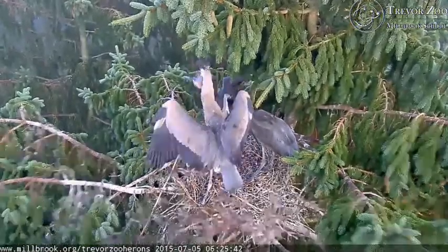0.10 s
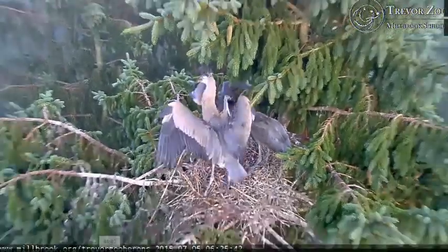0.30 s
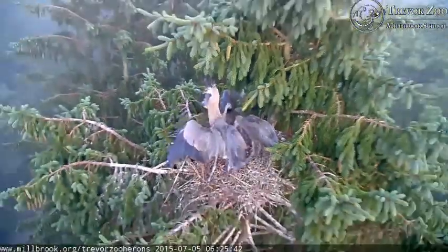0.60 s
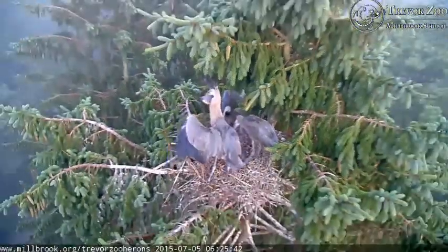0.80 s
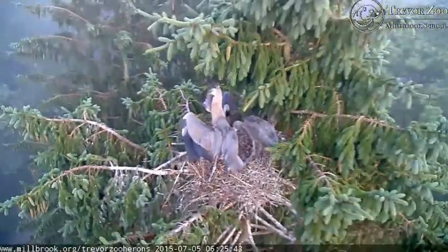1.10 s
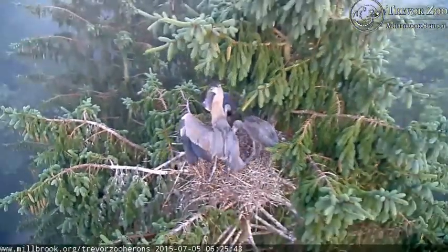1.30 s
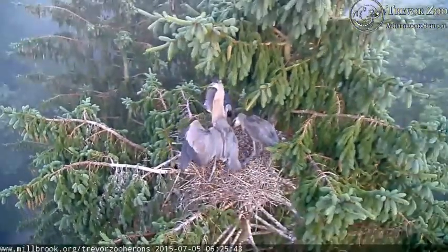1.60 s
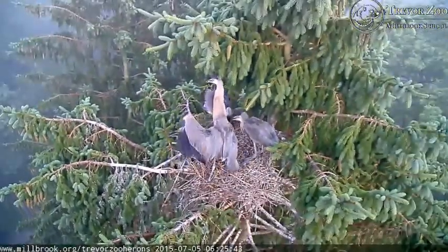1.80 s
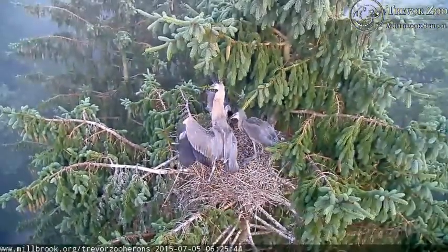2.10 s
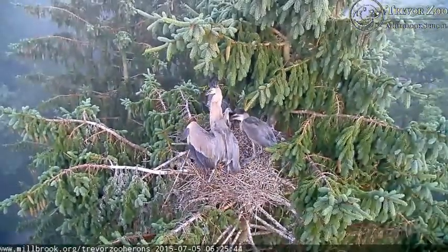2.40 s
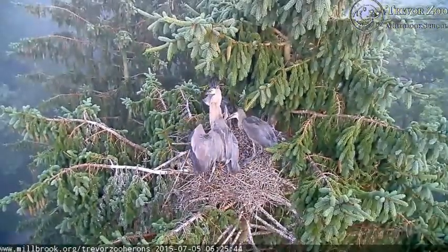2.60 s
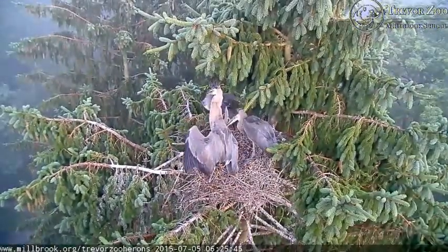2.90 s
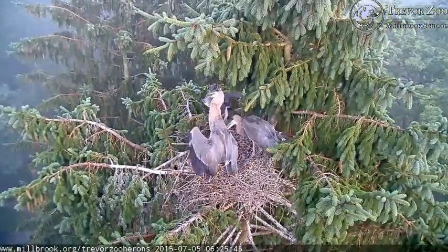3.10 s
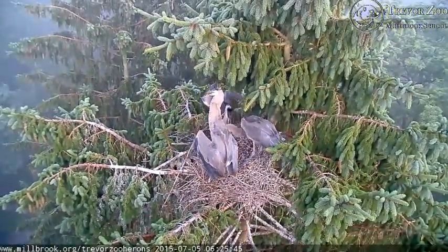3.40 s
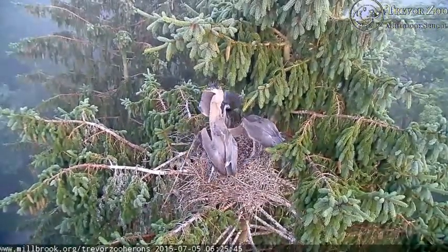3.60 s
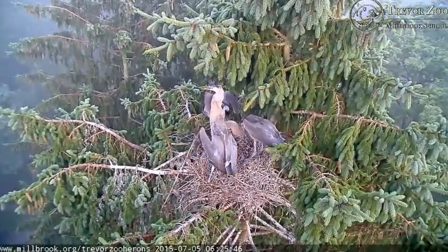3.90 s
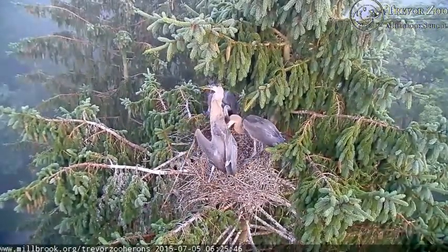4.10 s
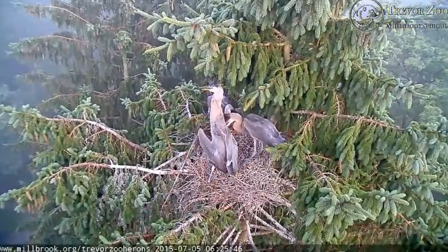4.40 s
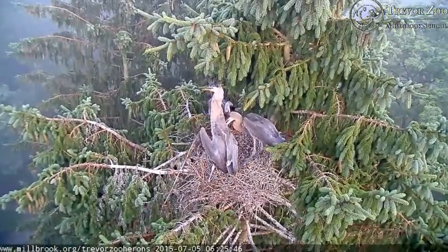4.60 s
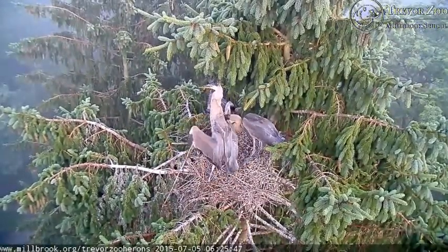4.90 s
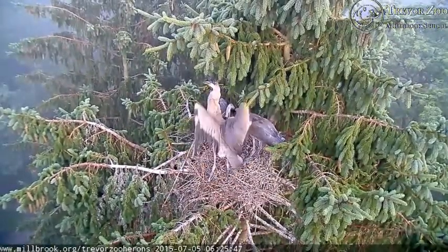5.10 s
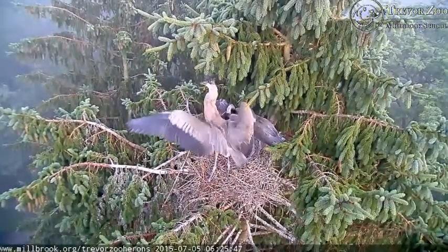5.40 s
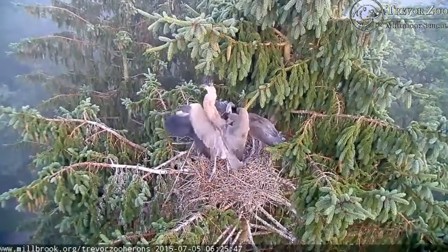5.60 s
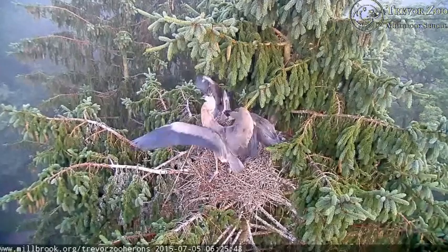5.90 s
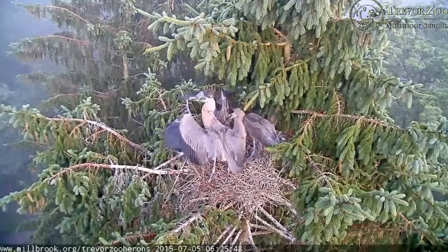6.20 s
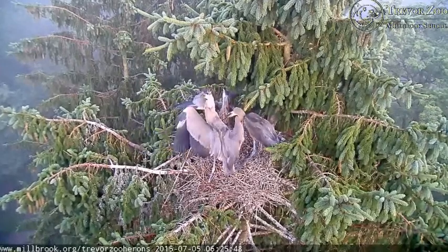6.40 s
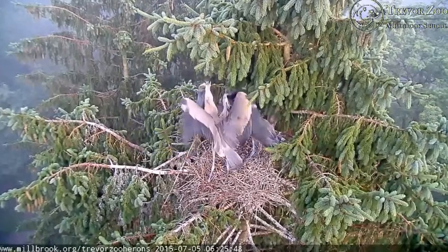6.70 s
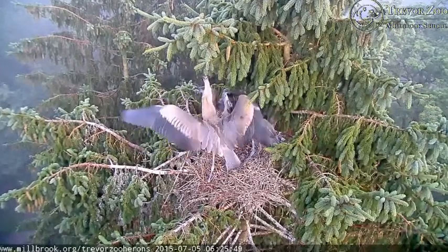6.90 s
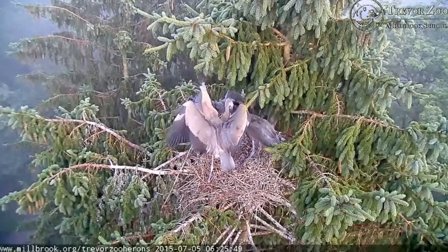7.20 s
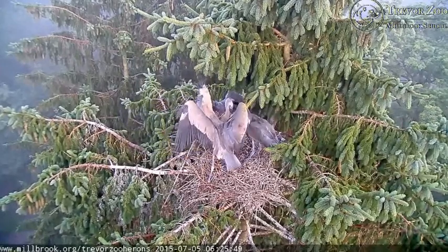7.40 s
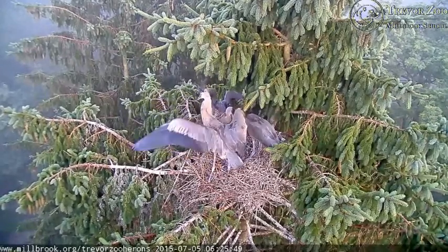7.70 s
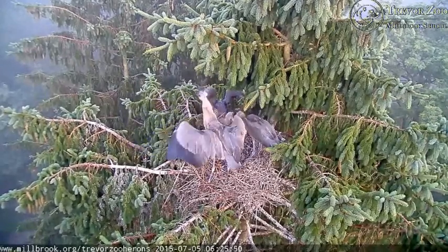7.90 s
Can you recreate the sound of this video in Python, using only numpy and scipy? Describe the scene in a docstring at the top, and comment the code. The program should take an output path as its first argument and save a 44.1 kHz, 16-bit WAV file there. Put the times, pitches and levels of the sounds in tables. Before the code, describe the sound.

Heron chicks beg with dry, rapid, rattling kek calls, pausing twice, while distant songbirds whistle in the woods.

```python
"""Heron chicks beg in a treetop nest: dry, rattling "kek" calls, about seven a second, ring in throat
and bill. At first a far songbird trills and wings flap, then feet knock on the sticks. Near 3 seconds
the chicks pause and songbirds whistle in the woods. The keks return, sink to soft grumbles and brushing
feathers around 6 seconds, then burst out again with the loudest call. All along, a nest camera's dull
microphone adds a little hum and a thin wavering whine to the wash of the woods."""
import sys
import numpy as np
from scipy import signal
from scipy.fft import rfft, irfft, next_fast_len
from scipy.io import wavfile
from scipy.ndimage import uniform_filter1d, minimum_filter1d, map_coordinates

SR = 44100
rng = np.random.default_rng(int(sys.argv[2]) if len(sys.argv) > 2 else 0)


def master_out(mix):
    """Clip the mix to full scale and print it as 16-bit PCM to the path in sys.argv[1]."""
    frames = np.transpose(np.atleast_2d(mix))
    ceiling = np.clip(frames, -1, 1)
    pcm = np.round(ceiling * 32767).astype(np.int16)
    wavfile.write(sys.argv[1], SR, pcm)


N = 356328
TIME = np.arange(N) / SR

KEK_S, CLACKS_PER_S = 0.059, 76  # length and rattle speed of an easy call
STRAIN_DB, RATTLE_PER_DB, FASTEST_PER_S = -24, 12, 135  # above this level, the rattle speeds up
FORCED_DB, HALVING_DB = -18, 5.5  # above this level, the call runs out sooner
MOUTH_LAG = 0.53  # dB the mouth falls behind the bill for each dB of effort
# How the tone drifts as the bill opens and closes. Each row: time in seconds, bill resonance in Hz,
# upper bill resonance in relative dB, mouth in relative dB, level in dB where the throat stops growing.
BILL_OPENING = [(0, 2500, -8, -12, -43), (0.761, 2490, -3, -8, -40.5), (1.04, 2470, -4, 0, -34),
                (1.45, 2390, -3.5, -14, -37), (1.94, 2610, -4.5, -2.5, -36), (2.56, 2850, -6.5, -7, -35),
                (3.78, 2520, -0.5, -9, -36), (4.03, 2200, 2, -19, -36.5), (4.3, 2530, -0.5, -8, -31),
                (4.85, 2620, -1, 0, -33), (5.05, 2880, -12.5, -7, -30.5), (5.3, 2950, -0.5, -2.5, -31),
                (5.68, 2160, -1, 1.5, -34.5), (6.68, 2590, -21, -2.5, -36), (6.79, 2620, -12, -21, -36.5),
                (7.23, 2690, 2, -19, -35.5), (7.4, 2570, -9, -4, -36), (7.69, 2660, -8, -10, -37.5),
                (7.84, 2660, -7.5, -9, -39)]
# Begging calls. Each row: time of the peak in seconds, level in dB, rise in seconds, rasp from 0 to 1.
BEGGING_CALLS = [(.003, -32, 0.025, 0.37), (0.093, -38, 0.016, 0.47), (0.263, -36.5, 0.021, 0.18),
                 (.629, -22, 0.029, 0.38), (.676, -29, 0.0096, .5), (.76, -19.5, 0.028, 0.32),
                 (.906, -22.5, 0.033, 0.31), (1.042, -27, 0.023, 0.64), (1.193, -24, 0.021, 0.37),
                 (1.341, -21, 0.029, 0.11), (1.488, -20.5, 0.029, 0.32), (1.634, -21.5, 0.03, 0.29),
                 (1.791, -27.5, 0.032, 0.2), (1.94, -28, 0.028, 0.41), (2.093, -30, 0.021, 0.38),
                 (2.257, -32, 0.03, 0.34), (2.409, -31.5, 0.032, 0.29), (2.558, -31, 0.023, 0.27),
                 (3.783, -31.5, 0.016, 0.56), (3.941, -29, 0.038, 0.29), (4.091, -29, .028, 0.05),
                 (4.238, -30, 0.019, 0.18), (4.399, -29, 0.013, 0.19), (4.562, -28, 0.031, .35),
                 (4.714, -31.5, 0.023, 0.22), (4.855, -32, 0.025, 0.55), (4.999, -22.5, 0.019, 0.28),
                 (5.153, -27.5, 0.03, 0.39), (5.303, -26.5, 0.023, .25), (5.478, -36.5, 0.023, 0.3),
                 (5.521, -30, 0.0069, .2), (5.664, -31.5, 0.015, 0.31), (5.906, -34, 0.017, 0.47),
                 (6.638, -34.5, 0.017, 0.19), (6.675, -13.5, 0.014, .3), (6.78, -29, .031, 0.52),
                 (6.929, -30, 0.026, 0.49), (7.067, -24.5, 0.028, 0.53), (7.226, -26.5, 0.024, .08),
                 (7.372, -21.5, .024, 0.49), (7.517, -25.5, 0.016, 0.54), (7.688, -24, 0.027, 0.18),
                 (7.834, -24.5, 0.023, 0.13), (7.985, -25, 0.026, 0.12)]


def keks(easy_db=-31.5):
    """Harder calls rattle faster and end sooner; the throat levels off, so the bill rings more."""
    track = np.zeros(N)
    times, *columns = np.transpose(BILL_OPENING)
    for s, db, rise, rasp in BEGGING_CALLS:
        bill_hz, upper_db, mouth_db, ceiling_db = (np.interp(s, times, column) for column in columns)
        rate = min(CLACKS_PER_S + RATTLE_PER_DB * max(db - STRAIN_DB, 0), FASTEST_PER_S)
        length = KEK_S * .5 ** (max(db - FORCED_DB, 0) / HALVING_DB)
        throat_db = -20 * np.log10(np.hypot(1, amp(db - ceiling_db)))
        mouth_db -= MOUTH_LAG * (db - easy_db)
        lead, sound = call(db, rate, rise, length - rise, rasp, bill_hz, throat_db, mouth_db, upper_db)
        add(track, s - lead, sound)
    return track


def call(db, rate, rise, fall, rasp, bill_hz, throat_db, mouth_db, upper_db, bright_db=-10.5):
    """One push of rattle and breath rings throat and bill. Gives (seconds before the peak, sound)."""
    t = np.arange(-SR // 8, SR // 5) / SR
    rise, fall = max(rise, .002), max(fall, .008)
    push = np.exp(-np.where(t < 0, np.abs(t / rise) ** 3, np.abs(t / fall) ** 1.5))
    breath = np.clip(rasp, 0, 1)
    source = np.sqrt(1 - breath ** 2) * rattle(t, rate, rasp) + breath * rng.standard_normal(len(t))
    ring = throat_and_bill(bill_hz, throat_db, mouth_db, upper_db, effort_db=db - bright_db)
    voice = signal.fftconvolve(push * source, np.convolve(ring, twig_echoes()))
    voice *= np.linalg.norm(push) / np.linalg.norm(voice)  # the push alone sets the rattle's energy
    voice[:len(t)] += amp(throat_db - 6) * undertone(t, source, rise)
    return -t[0], amp(db) * voice


def rattle(t, rate, rasp, jitter=.08, scatter_db=1.5, accent_db=1.5, count=41):
    """Uneven clacks, accented near t = 0; each is a flutter of snaps, drawn out in a raspy call."""
    filled = .42 + .5 * rasp  # how much of the time between clacks the snaps fill
    beats = np.cumsum(1 + jitter * rng.standard_normal(count))
    starts = (beats - beats[count // 2]) / rate - .003
    sizes = amp(scatter_db * rng.standard_normal(count))
    sizes[count // 2] = amp(accent_db)
    flutter = np.linspace(0, 1, num=10)
    slips = jitter / 2 * rng.standard_normal((count, len(flutter)))
    times = starts[:, None] + filled / rate * (flutter + slips)
    snaps = sizes[:, None] * amp(-6 * flutter) * rng.choice([-1, 1], times.shape)
    heard = (times > t[0]) & (times < t[-1])
    samples = np.round((times[heard] - t[0]) * SR).astype(int)
    return unit(np.bincount(samples, snaps[heard], len(t)))


BILL_WIDTH_HZ, UPPER_HZ, UPPER_WIDTH_HZ = 386, 3528, 393  # the bill's main and upper resonances
# Where throat and mouth ring, bill half open. Each row: centre in Hz, width in Hz, relative level in dB.
THROAT_RESONANCES = [(488, 217, -3), (835, 320, -5)]
MOUTH_RESONANCES = [(2040, 1550, -7.5)]
# The broad snap under the resonances. Each row: frequency in Hz, relative level in dB.
SNAP_TONE = [(300, -27.5), (450, -16), (1400, -27.5), (3000, -9), (4100, -18.5), (4700, -29), (5400, -40.5),
             (6500, -69), (9000, -88), (15000, -48)]


def throat_and_bill(bill_hz, throat_db, mouth_db, upper_db, effort_db, lowest_hz=420, drift=0.075):
    """The ring of throat, mouth and bill: a little different in every call, brighter with effort."""
    hz = np.fft.rfftfreq(1024, 1 / SR)
    power = amp(along(SNAP_TONE, hz)) ** 2 + resonance(hz, bill_hz, BILL_WIDTH_HZ) ** 2
    power += (amp(upper_db + 2.0) * resonance(hz, UPPER_HZ, UPPER_WIDTH_HZ)) ** 2
    for resonances, part_db in ((THROAT_RESONANCES, throat_db), (MOUTH_RESONANCES, mouth_db)):
        for centre, width, db in resonances:
            drifted_hz = centre * np.exp(drift * rng.normal())
            power += (amp(db + part_db) * resonance(hz, drifted_hz, width)) ** 2
    treble_edge_hz = 5400 * amp(0.11 * effort_db)
    edge_loss = (1 + (hz / treble_edge_hz) ** 4) * (1 + (lowest_hz / (hz + 1)) ** 6)
    return ringing(np.sqrt(power / edge_loss))


# The hoarse tone of the open throat. Each row: centre in Hz, width in Hz, relative level in dB.
GULLET_RESONANCES = [(522, 197, 0.5), (776, 150, 2.5), (1002, 210, 3), (1830, 1150, -9.5)]


def undertone(t, source, lead_s, hold_s=0.097, fade_db=7):
    """A rough groan that starts with the rattle, outlasts it, and stops as the throat closes."""
    def gullet(hz):
        peaks = (amp(db) * resonance(hz, centre, width) for centre, width, db in GULLET_RESONANCES)
        return np.sqrt(sum(peak ** 2 for peak in peaks))

    throat_open = np.exp(-np.abs(t / np.where(t < 0, lead_s, hold_s)) ** 8)
    rough_air = source + 1.12 * rng.standard_normal(len(t))
    return unit(filtered(rough_air, gullet)) * throat_open * amp(-fade_db * t / hold_s)


# Soft grumbles, mostly between runs of keks. Each row: time of the peak in seconds, level in dB,
# length in seconds, bill resonance in Hz, mouth in relative dB.
SOFT_CALLS = [(0.381, -42.5, .27, 3100, -5.5), (0.539, -39, 0.15, 2290, -1.5), (2.466, -37.5, .1, 2280, -5),
              (2.631, -38, 0.068, 1920, 3), (3.69, -43, 0.047, 2620, -20), (5.743, -41.5, 0.17, 2400, -1),
              (5.961, -41, 0.12, 2200, 1), (6.052, -41, 0.11, 2620, 1), (6.277, -38.5, 0.096, 2540, -26),
              (6.399, -36.5, 0.17, 2520, -28)]


def grumbles(rise_share=0.29):
    """The same voice at low effort: long, hoarse and throaty."""
    track = np.zeros(N)
    for s, db, length, bill_hz, mouth_db in SOFT_CALLS:
        rise = rise_share * length
        lead, sound = call(db, CLACKS_PER_S, rise, length - rise, rasp=0.47, bill_hz=bill_hz,
                           throat_db=-5, mouth_db=mouth_db, upper_db=-8.5)
        add(track, s - lead, sound)
    return track


# The bright tone of the crackle. Each row: frequency in Hz, relative level in dB.
CRACKLE_TONE = [(2500, -29), (4800, 4), (6500, -3.5), (9000, -11), (12000, -19), (15000, -27)]
# Crackles on a few calls. Each row: time of the peak in seconds, level in dB.
PEAK_CRACKLES = [(2.559, -65), (4.562, -61), (5.304, -51.5), (5.524, -53), (6.67, -44.5), (7.364, -53),
                 (7.51, -54)]


def crackles(rise_s=0.006, fall_s=0.023):
    """A short, bright, rattling crackle at the peaks of a few calls, strongest on the loudest one."""
    track = np.zeros(N)
    t = np.arange(-SR // 20, SR // 8) / SR
    swell = np.exp(-(t / np.where(t < 0, rise_s, fall_s)) ** 2)
    for s, db in PEAK_CRACKLES:
        grit = rattle(t, CLACKS_PER_S, rasp=0.6) + 0.39 * rng.standard_normal(len(t))
        add(track, s + t[0], amp(db) * swell * coloured(grit, CRACKLE_TONE))
    return track


# Wing beats. Each row: time of the peak in seconds, level in dB, pitch in Hz, swell time in seconds.
WING_BEATS = [(.48, -43.5, 123, 0.009), (.605, -42.5, 165, 0.01), (.68, -44.5, 182, 0.012),
              (1.13, -49, 173, 0.044), (1.19, -55, 124, 0.022), (5.85, -52.5, 75.4, 0.085),
              (6.2, -67, 60, 0.042)]


def wings(width_hz=62):
    """Each wing beat pushes a soft, low puff of air."""
    track = np.zeros(N)
    t = np.arange(SR // 2) / SR
    for s, db, centre_hz, swell_s in WING_BEATS:
        puff = unit(filtered(rng.standard_normal(len(t)), lambda hz: resonance(hz, centre_hz, width_hz)))
        swell = np.exp(-((t - t.mean()) / swell_s) ** 2)
        add(track, s - t.mean(), amp(db) * puff * swell)
    return track


# The tone of the stick nest when knocked. Each row: frequency in Hz, relative level in dB.
NEST_TONE = [(50, -38), (170, 1.5), (330, -10), (480, 4), (700, -25), (2000, -42), (8000, -60)]
# Steps on the sticks. Each row: start in seconds, relative level in dB.
FOOTSTEPS = [(1.142, -36), (2.076, -37.5), (2.22, -35.5), (2.803, -43.5)]


def feet(attack_s=0.003, die_away_s=0.084):
    """Feet thud on the platform of sticks, which quickly falls still."""
    track = np.zeros(N)
    t = np.arange(SR // 2) / SR
    for s, db in FOOTSTEPS:
        thud = coloured(rng.standard_normal(len(t)), NEST_TONE)
        fade = amp(db - 0.5 - 60 * t / die_away_s)
        add(track, s, fade * thud * (1 - np.exp(-t / attack_s)))
    return track


# The tone of rubbing feathers. Each row: frequency in Hz, relative level in dB.
FEATHER_TONE = [(500, -27), (3000, 12), (7000, -7), (10000, -8.5), (15000, -14)]
# Feather strokes. Each row: time of the peak in seconds, level in dB, swell time in seconds.
FEATHER_STROKES = [(0.055, -52.5, 0.061), (0.237, -62.5, 0.11), (0.377, -56, 0.083), (5.806, -67, 0.089),
                   (6.254, -61.5, 0.59)]


def feathers():
    """A faint, uneven swish where wings brush past one another."""
    strokes = sum(amp(db) * np.exp(-((TIME - s) / swell_s) ** 2) for s, db, swell_s in FEATHER_STROKES)
    swish = coloured(rng.standard_normal(N), FEATHER_TONE)
    return strokes * unit(swish * amp(1.4 * wobble(150)))


TRILL_START_S, TRILL_STEP_S, TRILL_NOTE_S = 0.022, 0.1165, 0.056
TRILL_FROM_HZ, TRILL_TO_HZ, TRILL_DB = 7000, 4060, -59
# Whistles. Each row: start in seconds, length in seconds, first pitch in Hz, last in Hz, level in dB.
SONGBIRD_WHISTLES = [(2.625, 0.09, 1990, 1954, -51), (3.138, 0.058, 3200, 3380, -50),
                     (3.178, .037, 3180, 2900, -41.5), (3.239, 0.05, 3050, 2250, -50),
                     (3.282, 0.097, 2376, 2270, -52.5), (3.72, .073, 3310, 3000, -44),
                     (4.337, .067, 3250, 2850, -42), (4.886, 0.1, 3220, 2500, -44.5),
                     (5.225, .094, 4750, 3200, -43.5), (5.326, 0.14, 3340, 3080, -46),
                     (6.79, .22, 5230, 5190, -44.5)]


def songbirds(trill_notes=5, swoop=1.35, sag=0.028):
    """A short trill, then scattered whistles; every note is a glide, made unsteady by the leaves."""
    track = np.zeros(N)
    trill = [(TRILL_START_S + k * TRILL_STEP_S, TRILL_NOTE_S, TRILL_FROM_HZ, TRILL_TO_HZ, TRILL_DB)
             for k in range(trill_notes)]
    for s, length, start_hz, end_hz, db in trill + list(SONGBIRD_WHISTLES):
        progress = np.linspace(0, 1, int(length * SR))
        arch = np.sin(np.pi * progress)
        glide_hz = end_hz + (start_hz - end_hz) * (1 - progress) ** swoop  # fastest at the start
        pitch_hz = glide_hz * (1 - sag * arch)  # dips a little in the middle
        add(track, s, amp(db) * np.sqrt(2) * arch * sine(pitch_hz))
    return track * amp(0.76 * wobble(40))


def twig_echoes(count=6, reach_s=.006, strength=.2):
    """The direct sound and a few weak copies off nearby birds and sticks; they colour each call."""
    echoes = np.zeros(int(reach_s * SR))
    echoes[rng.integers(len(echoes) // 8, len(echoes), count)] = strength * rng.choice([-1, 1], count)
    echoes[0] = 1
    return echoes


# How long the trees echo. Each row: frequency in Hz, seconds to fade by 60 dB.
TREE_FADE_TIMES = [(150, 0.22), (800, 0.27), (1600, 0.48), (2800, 0.32), (5000, 0.32), (12000, 0.14)]


def tree_echoes(x, pieces=16, build_s=0.024):
    """Scattered echoes from trunks and boughs, changing as the birds move."""
    echoes = np.zeros(N)
    hop = N // pieces + 1
    for start in range(0, N, hop):
        hz, t, noise = signal.stft(rng.standard_normal(SR * 2 // 3), SR, nperseg=256)
        fade = amp(-60 * t / along(TREE_FADE_TIMES, hz)[:, None])
        tail = signal.istft(noise * fade * (1 - np.exp(-t / build_s)), SR, nperseg=256)[1]
        add(echoes, start / SR, signal.fftconvolve(x[start:start + hop], tail / np.linalg.norm(tail)))
    return echoes


# The tone of the steady wash. Each row: frequency in Hz, relative level in dB.
WOODS_TONE = [(15, -32), (30, -8), (80, -5.5), (140, -11), (220, -10), (380, -17), (950, -23),
              (2000, -15.5), (2900, -6.5), (3800, -10.5), (4800, -25), (6500, -37), (9500, -41.5),
              (15500, -43)]


def woods(level_db=-47.5):
    """Distant woods and microphone hiss blend into an even wash."""
    return amp(level_db + 0.52 * wobble(5.38)) * coloured(rng.standard_normal(N), WOODS_TONE)


# The path the whine wavers around. Each row: time in seconds, pitch in Hz.
WHINE_PITCH = [(0.0, 10819), (0.88, 10600), (2.05, 10936), (2.11, 10778), (2.83, 10781), (3.42, 11033),
               (3.49, 10960), (4.3, 10911), (4.5, 11047), (4.93, 10830), (6.95, 10988), (7.09, 10807),
               (7.99, 10699), (8.08, 10757)]


def hum_and_whine(hum_hz=103.6, hum_db=-61.5, whine_db=-75):
    """The camera's low, unsteady hum and thin electronic whine."""
    hum = amp(hum_db + 4.3 * wobble(19)) * sine(hum_hz + 5 * wobble(18))
    whine_hz = np.interp(TIME, *np.transpose(WHINE_PITCH)) + 20 * wobble(15) + 35 * wobble(300)
    return hum + amp(whine_db) * sine(whine_hz)


def limiter(x, ceiling=.42, window=132):
    """Turns the volume down for a few milliseconds around the loudest peaks."""
    gain = ceiling / np.maximum(np.abs(x), ceiling)
    return x * uniform_filter1d(minimum_filter1d(gain, window), window)


def amp(db):
    """Turn decibels into a multiplier."""
    return 10 ** (np.asarray(db) / 20)


def unit(x):
    """Scale a sound to an average power of 1."""
    return x / np.sqrt(np.mean(x ** 2) + 1e-20)


def sine(hz):
    """A pure tone that follows a changing pitch."""
    return np.sin(2 * np.pi * np.cumsum(hz) / SR)


def along(points, hz):
    """Read between (Hz, value) rows, with every octave equally wide."""
    frequencies, values = np.transpose(points)
    return np.interp(np.log(hz + 1), np.log(frequencies + 1), values)


def wobble(rate):
    """A smooth curve through `rate` random points a second."""
    return map_coordinates(rng.standard_normal(int(N * rate / SR) + 4), [TIME * rate])


def filtered(x, response):
    """Multiply each frequency in a sound by response(hz)."""
    size = next_fast_len(len(x) + SR // 10)
    return irfft(rfft(x, size) * response(np.fft.rfftfreq(size, 1 / SR)), size)[:len(x)]


def coloured(x, tone):
    """Give a sound the tone of a (Hz, dB) table, at an average power of 1."""
    return unit(filtered(x, lambda hz: amp(along(tone, hz))))


def add(track, s, sound):
    """Mix a sound into the track at s seconds."""
    start = round(s * SR)
    part = sound[max(-start, 0):max(N - start, 0)]
    track[max(start, 0):][:len(part)] += part


def resonance(hz, centre, width):
    """A peak that passes frequencies near its centre and falls steeply on both sides."""
    return 1 / (1 + ((hz ** 2 - centre ** 2) / (np.sqrt(2) * width * (hz + 1))) ** 2)


def ringing(gain):
    """The ring, of energy 1, that one click leaves in a filter with this gain."""
    cepstrum = irfft(np.log(np.maximum(gain, 1e-6)))
    half = len(cepstrum) // 2
    cepstrum[1:half] *= 2
    cepstrum[half + 1:] = 0  # so nothing rings before the click
    response = irfft(np.exp(rfft(cepstrum)))
    return response / np.linalg.norm(response)


def scene(nest_echo_db=-14, song_echo_db=-5, hillside_s=0.13, hillside_db=-20):
    """The nest is near and fairly dry; the songbirds are deeper among the trees."""
    nest = keks() + grumbles() + crackles() + wings() + feet() + feathers()
    song = songbirds()
    into_trees = amp(nest_echo_db) * nest + amp(song_echo_db) * song
    add(into_trees, hillside_s, amp(hillside_db) * song)  # a late echo off the hillside
    return (nest + song + tree_echoes(into_trees) + woods() + hum_and_whine())[None]


def record(dry, top_hz=15500):
    """The camera holds down the peaks and cuts off the highest treble."""
    return np.array([filtered(limiter(channel), lambda hz: hz < top_hz) for channel in dry])


dry = scene()
out = record(dry)
master_out(out)
```